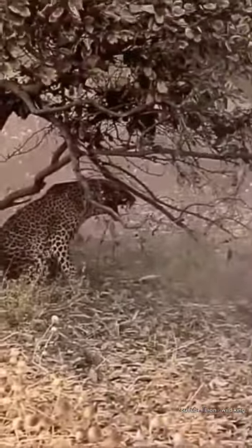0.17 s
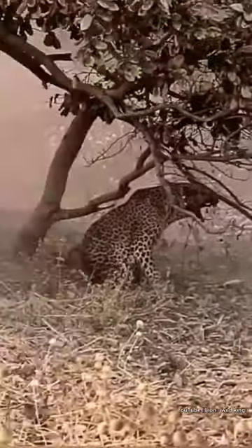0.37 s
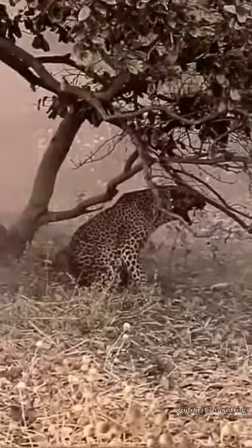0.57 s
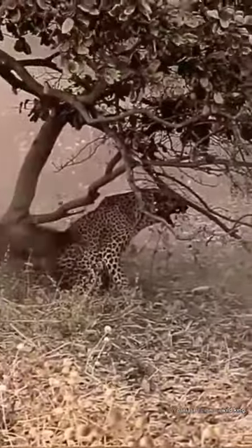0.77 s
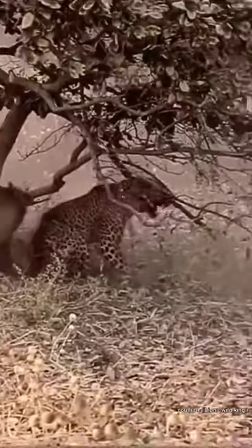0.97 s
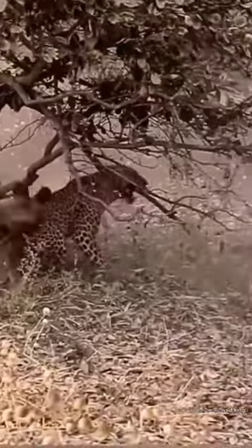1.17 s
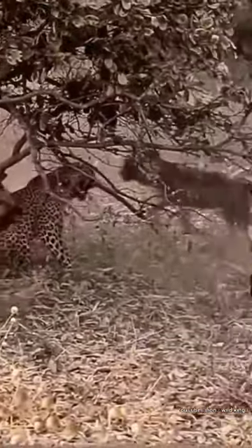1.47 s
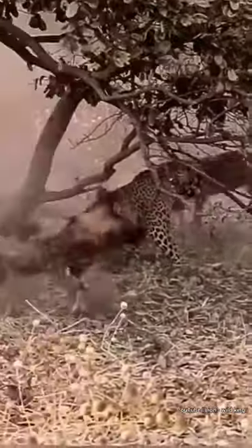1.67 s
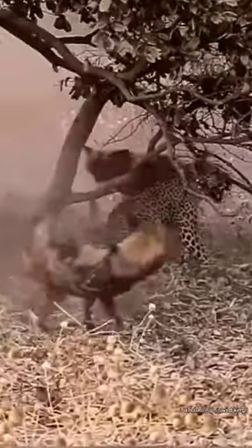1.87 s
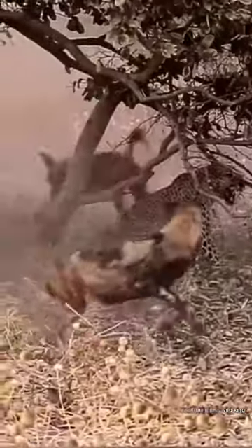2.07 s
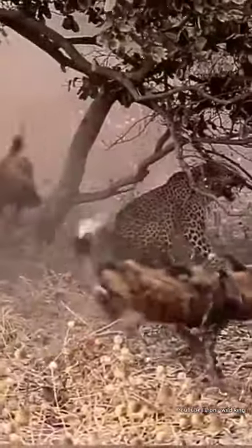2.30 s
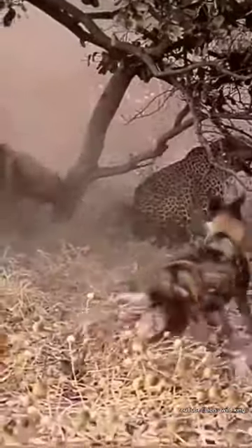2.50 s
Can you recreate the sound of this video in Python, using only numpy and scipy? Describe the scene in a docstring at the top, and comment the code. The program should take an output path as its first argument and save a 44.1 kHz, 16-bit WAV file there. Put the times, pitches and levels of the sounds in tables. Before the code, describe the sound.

Wild dogs yip, squeak and twitter in rapid clusters while running through dry grass.

```python
"""A wild dog's yip comes first, then high, swooping squeaks close by and the twitter of the whole pack.
The microphone stands in open bush, where the dogs dart around a leopard in crackling dry grass.
Their vocal folds give arched yips, yelps hoarse with rushing air and one long whine; paws thud.
Midway the leopard growls, slow pulses rattling its chest. Trees scatter a short tail after every call."""
import sys
import numpy as np
from scipy import signal
from scipy.fft import rfft, irfft, next_fast_len
from scipy.io import wavfile

SR = 44100
rng = np.random.default_rng(int(sys.argv[2]) if len(sys.argv) > 2 else 0)


def master_out(mix):
    """Clip the mix to full scale and print it as 16-bit PCM to the path in sys.argv[1]."""
    frames = np.transpose(np.atleast_2d(mix))
    ceiling = np.clip(frames, -1, 1)
    pcm = np.round(ceiling * 32767).astype(np.int16)
    wavfile.write(sys.argv[1], SR, pcm)


N = 116424

# clear yips: (start [s], length [s], first pitch [Hz], middle pitch [Hz], last pitch [Hz], level [dB])
YIP_CALLS = [(.002, 0.0404, 831.5, 974, 789.4, -26), (0.089, 0.03035, 1296, 1346, 897, -20),
             (0.099, 0.0494, 1018, 1026, 858.3, -24.5), (0.34, 0.0467, 1537, 1564, 829, -22),
             (0.44, 0.0989, 1087, 955, 895.7, -21), (0.766, 0.0552, 1613, 1825, 953, -20),
             (1.163, 0.0366, 1573, 1729, 987, -17.5), (1.29, 0.02174, 1340, 1304, 1050, -18),
             (1.553, 0.0492, 1639, 1835, 759.4, -17.5), (1.943, 0.0469, 1778, 1536, 883.4, -20),
             (2.243, 0.03523, 1311, 1186, 952, -17.5), (2.267, 0.0491, 1344, 1460, 1062, -24),
             (2.474, 0.1311, 934.7, 921.6, 1034, -31.5), (2.517, 0.01564, 1294, 1073, 897, -20),
             (2.609, 0.0328, 1581, 1390, 1116, -18.5)]
# first three harmonics of a full-voiced yip at the top of its arch: (relative level [dB])
YIP_PARTIALS_DB = [0.5, -5.5, -10.5]
# near squeaks: (start [s], length [s], first pitch [Hz], middle pitch [Hz], last pitch [Hz], level [dB])
NEAR_SQUEAKS = [(0.048, 0.0538, 8708, 9387, 8984, -21.5), (0.158, 0.0139, 6440, 8050, 11320, -21),
                (0.184, 0.0935, 9516, 5880, 11430, -34.5), (0.473, 0.0296, 10000, 7978, 10830, -22),
                (0.526, 0.0546, 11400, 10940, 11690, -36), (0.752, .022, 8010, 9410, 15180, -20.5),
                (0.789, 0.0398, 8200, 8753, 9616, -22), (0.979, 0.0473, 7300, 5665, 9974, -24.5),
                (1.33, 0.02127, 9646, 8102, 7177, -16.5), (1.542, 0.0181, 8527, 8324, 13330, -21),
                (1.704, 0.0283, 7064, 8520, 7916, -16.5), (1.711, 0.064, 6897, 5894, 5238, -22.5),
                (1.992, .06, 5698, 6411, 5838, -22.5), (2.001, 0.0288, 7560, 8550, 8460, -15.5),
                (2.056, 0.0472, 5840, 5364, 5753, -20), (2.183, 0.083, 5773, 5163, 5237, -26.5),
                (2.36, 0.0531, 6260, 5480, 5715, -17.5)]
# flurries from the rest of the pack: (start [s], length [s], level [dB])
PACK_FLURRIES = [(0.072, 0.1944, -27), (0.406, 0.148, -28), (0.611, .11, -33), (0.813, 0.1694, -25.5),
                 (1.147, 0.1815, -24.5), (1.613, 0.156, -28), (1.959, 0.24, -29), (2.252, 0.05974, -22),
                 (2.319, 0.277, -29.5), (2.593, 0.046, -22.5)]
# heavy footfalls: (time [s])
THUD_TIMES = [.13, 0.861, 1.659, 2.31]
# yelps: (start [s], length [s], first pitch [Hz], last pitch [Hz], level [dB], roughness [0-1],
# mouth resonance [Hz])
YELP_CALLS = [(0.162, 0.03427, 1076, 1045, -19, 0.18, 2272), (0.238, 0.0378, 684.7, 612.4, -19, 0.04, 1351),
              (0.442, 0.02494, 883, 912.4, -19, 0.61, 1960), (0.827, 0.0942, 780, 577.2, -20, 0.6, 1890),
              (0.918, 0.0532, 638.4, 643.5, -22.5, 0.17, 1225),
              (0.946, 0.0456, 839.2, 948.7, -22.5, 0.63, 1540),
              (1.257, 0.0396, 922, 754.4, -19.5, 0.86, 1480), (1.35, 0.0308, 923.7, 915.2, -18, 0.11, 1870),
              (1.648, 0.0527, 591.9, 546.5, -20, 0.44, 1507), (1.732, 0.038, 975.5, 976.6, -21, 0.85, 2176),
              (2.034, 0.0535, 1106, 827.5, -21, 0.25, 1415), (2.139, 0.0423, 553.8, 506.6, -27, 0.5, 1206)]
# response of a dog's throat: (frequency [Hz], gain [dB])
THROAT_RESPONSE = [(540, -22.5), (850, -1), (3100, -7.5), (4600, -11), (12000, -31.5)]
# course of the whine: (time [s], pitch [Hz], level before its band-pass [dB])
WHINE_COURSE = [(.485, 705.8, -13.5), (0.528, 684, -16.5), (0.581, 723.8, -18.5), (0.62, 654.3, -24),
                (.66, 668.4, -12), (0.714, 745.8, -16.5), (0.736, 771.5, -16.5), (0.766, 779, -19.5)]
# pulses of the growl: (time [s])
GROWL_TIMES = [1.252, 1.305, 1.392, 1.442, 1.481, 1.534, 1.59]
# resonances of the leopard's chest: (frequency [Hz], time to fall 60 dB [s], amplitude [ratio])
CHEST_MODES = [(201, 0.0481, 0.916), (328.7, 0.0976, 0.287)]
# background of the open bush: (frequency [Hz], relative level [dB])
BUSH_SPECTRUM = [(30, -26), (130, 3.5), (450, -3.5), (1100, 3), (8500, -5.5), (14000, -13)]

ATTACK_S, RELEASE_S, FLUTTER_DB, FLUTTER_HZ = 0.00455, 0.00623, 2.5, 87.1
JITTER, JITTER_HZ, RASP = 0.05153, 125.6, 0.436  # depths at roughness 1


def undb(db):
    """Decibels to gain."""
    return 10 ** (np.asarray(db) / 20)


def unit(x):
    """Scale to rms 1."""
    return x / np.sqrt(np.mean(x ** 2) + 1e-18)


def read_db(points, hz):
    """Read (frequency [Hz], level [dB]) points on a log frequency axis."""
    f, db = np.array(points).T
    return np.interp(np.log(hz + 1), np.log(f), db)


def band(x, lo_hz, hi_hz, order=2):
    """Band-pass, gentle by default."""
    return signal.sosfilt(signal.butter(order, [lo_hz, hi_hz], "band", fs=SR, output="sos"), x)


def noise(n, gain_at):
    """Noise of rms 1, shaped by a gain at each frequency."""
    spectrum = rfft(rng.standard_normal(n)) * gain_at(np.fft.rfftfreq(n, 1 / SR))
    return unit(irfft(spectrum, n))


def wobble(n, rate_hz):
    """Smooth random wander of spread about 1, moving up to the given rate."""
    return noise(next_fast_len(n + 2048), lambda f: np.exp(-.5 * (f / rate_hz) ** 2))[:n]


def clicks(n, per_s):
    """Impulses of random size at random times."""
    return rng.standard_normal(n) * (rng.random(n) < per_s / SR)


def add(out, start, x):
    """Mix x in at a time in seconds."""
    i = max(int(start * SR), 0)
    out[i:i + len(x)] += x[:max(N - i, 0)]


def gesture(length, pitches):
    """Pitch bending through evenly spaced points, and a fluttering attack-hold-release envelope."""
    u = np.linspace(0, 1, int(length * SR))
    bend = np.polyfit(np.linspace(0, 1, len(pitches)), pitches, len(pitches) - 1)
    ramp = np.minimum(u * length / ATTACK_S, 1) * np.minimum((1 - u) * length / RELEASE_S, 1)
    flutter = undb(FLUTTER_DB * wobble(len(u), FLUTTER_HZ))
    return np.polyval(bend, u), np.sin(ramp * np.pi / 2) ** 2 * flutter


def folds(hz, harmonics_db, rough, rasp_hz=262):
    """Vocal folds: harmonics of one jittering cycle, each fringed by rasp as the voice roughens."""
    n = len(hz)
    phase = 2 * np.pi * np.cumsum(hz * (1 + rough * JITTER * wobble(n, JITTER_HZ))) / SR
    out, power = 0, 0
    for k, db in enumerate(harmonics_db, 1):
        gain = undb(db) * (k * hz < SR / 2)
        turn = k * phase + 2 * np.pi * rng.random()
        fringe = wobble(n, rasp_hz) * np.cos(turn) + wobble(n, rasp_hz) * np.sin(turn)
        out += gain * (np.sin(turn) + rough * RASP * fringe)
        power += gain ** 2 * (1 / 2 + (rough * RASP) ** 2)
    return out / np.sqrt(power)


def bush_air(level_db=-41):
    """Soft background of the open bush, steady at the microphone throughout."""
    return undb(level_db) * noise(N, lambda f: undb(read_db(BUSH_SPECTRUM, f)))


def ground(grass_db=-45, paws_db=-63):
    """Dry grass crackles and paws patter as the pack runs."""
    crackle = clicks(N, per_s=1500) * rng.exponential(size=N)
    grass = band(crackle, 2000, 10300, order=5)
    patter = band(clicks(N, per_s=30), 76.4, 153)
    return undb(grass_db) * unit(grass) + undb(paws_db) * unit(patter)


def yips(full_voice_db=-18, fade_db_per_octave=-4.5):
    """Clear calls, most arching and then dropping; the softer ones are purer."""
    out = np.zeros(N)
    for start, length, *pitches, db in YIP_CALLS:
        hz, envelope = gesture(length, pitches)
        fade_db = fade_db_per_octave * np.log2(hz.max() / hz)
        harmonics_db = [h * db / full_voice_db + k * fade_db for k, h in enumerate(YIP_PARTIALS_DB)]
        rough = 0.1217 + 1.22 * (1 - hz / hz.max())  # the voice breaks up as the pitch drops
        add(out, start, undb(db + fade_db) * envelope * folds(hz, harmonics_db, rough))
    return out


def trees(x, wet_db, t60_s=0.2805):
    """Trunks and leaves scatter a short tail of echoes back to the microphone."""
    t = np.arange(SR // 2) / SR
    tail = band(clicks(len(t), per_s=1000), 210, 16930) * undb(-60 * t / t60_s)
    return x + undb(wet_db) * signal.fftconvolve(x, tail / np.linalg.norm(tail))[:N]


def whistle(length, pitches, rough):
    """One swoop of a dog's whistle-like upper voice: an unsteady tone and its weak octave."""
    hz, envelope = gesture(length, pitches)
    return envelope * folds(hz, [0, -24.5], rough, rasp_hz=642)


def squeaks():
    """The dogs nearest the microphone squeak high in the treble."""
    out = np.zeros(N)
    for start, length, *pitches, db in NEAR_SQUEAKS:
        add(out, start, undb(db) * whistle(length, pitches, rough=0.4334))
    return out


def twitter(per_s=300, squeak_s=0.024, pitch_hz=8520, spread=.17, bend=0.12):
    """Farther off, the pack answers in flurries of overlapping squeaks, each with its own bend."""
    out = np.zeros(N)
    for start, length, db in PACK_FLURRIES:
        for time in np.arange(start, start + length, 1 / per_s):
            pitches = pitch_hz * np.exp(spread * rng.uniform(-2, 1.3) + bend * rng.standard_normal(3))
            onset = time - squeak_s * rng.random()
            add(out, onset, undb(db) * whistle(squeak_s, pitches, rough=0.7664))
    return out / np.sqrt(per_s * squeak_s)  # overlapping squeaks add in power


def thuds(thud_db=-38.5, knock_db=-20.5, knock_at_s=0.57):
    """Paws land hard on the dusty ground, once with a sharp knock."""
    out, t = np.zeros(N), np.arange(SR // 10) / SR

    def impact(lo_hz, hi_hz, decay_s):
        return unit(band(rng.standard_normal(len(t)), lo_hz, hi_hz)) * np.exp(-t / decay_s)

    for start in THUD_TIMES:
        add(out, start, undb(thud_db) * impact(57.7, 342, decay_s=0.0192))
    add(out, knock_at_s, undb(knock_db) * impact(108, 2720, decay_s=0.0043))
    return out


def open_mouth(hz, mouth_hz, peak_db=8.5, width_octaves=0.1375, dull_db_per_octave=-11.5):
    """Gain in dB of the throat and one mouth resonance, dull from an octave above it."""
    octaves = np.log2(hz / mouth_hz)
    resonance_db = peak_db * np.exp(-.5 * (octaves / width_octaves) ** 2)
    return read_db(THROAT_RESPONSE, hz) + resonance_db + dull_db_per_octave * np.maximum(octaves - 1, 0)


def cry(hz, rough, mouth_hz, lurch=0.0395, turbulence=0.892):
    """An open-mouthed voice; as it roughens, the pitch lurches and harmonics give way to rushing air."""
    hz = hz * (1 + lurch * rough * wobble(len(hz), rate_hz=44.4))
    tone = folds(hz, [open_mouth(k * hz, mouth_hz) for k in range(1, 11)], rough)
    rush = noise(len(hz), lambda f: undb(open_mouth(f + 1, mouth_hz)))
    air_share = np.minimum(turbulence * rough ** 2, 1)
    return np.sqrt(1 - air_share) * tone + np.sqrt(air_share) * rush


def yelps():
    """Lower, open-mouthed calls, from clear to hoarse."""
    out = np.zeros(N)
    for start, length, *pitches, db, rough, mouth_hz in YELP_CALLS:
        hz, envelope = gesture(length, pitches)
        swell = unit(np.sqrt(np.hanning(len(hz))))
        add(out, start, undb(db) * envelope * swell * cry(hz, rough, mouth_hz))
    return out


def whine():
    """One drawn-out, wavering call, hoarser where it weakens."""
    out = np.zeros(N)
    times, pitches, db = np.array(WHINE_COURSE).T
    t = np.arange(times[0], times[-1], 1 / SR)
    effort = undb(np.interp(t, times, db))
    voice = cry(np.interp(t, times, pitches), rough=0.1251 * effort.max() / effort, mouth_hz=2066)
    add(out, times[0], effort * signal.windows.tukey(len(t), .1) * voice)
    return band(out, 827, 2970)


def growl(gain_db=-27):
    """Slow single pulses ring the leopard's chest."""
    out, t = np.zeros(N), np.arange(SR // 10) / SR
    ring = sum(gain * np.sin(2 * np.pi * hz * t) * undb(-60 * t / t60) for hz, t60, gain in CHEST_MODES)
    for start in GROWL_TIMES:
        add(out, start, undb(gain_db) * ring)
    return out


def scene():
    """One microphone among the trees: the calls and their echoes over footfalls, grass and air."""
    calls = trees(yips(), wet_db=-4)
    calls += trees(squeaks() + twitter(), wet_db=-7.5)
    calls += trees(yelps() + whine() + growl(), wet_db=-11)
    return (bush_air() + ground() + calls + thuds())[None]


def record(dry):
    """The recorder cuts the top steeply above 15.6 kHz."""
    return signal.sosfilt(signal.ellip(10, .2, 80, 15600, fs=SR, output="sos"), dry)


dry = scene()
out = record(dry)
master_out(out)
```